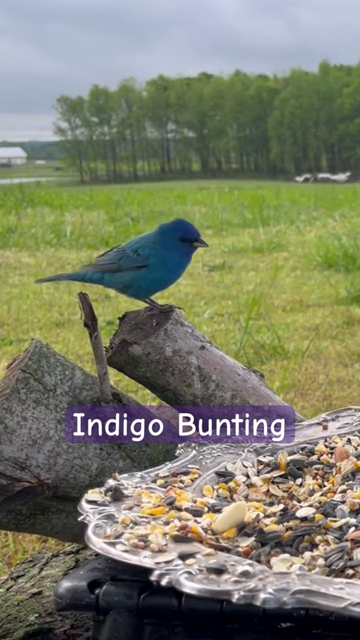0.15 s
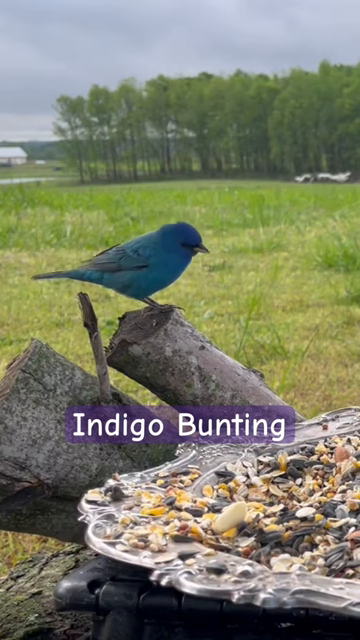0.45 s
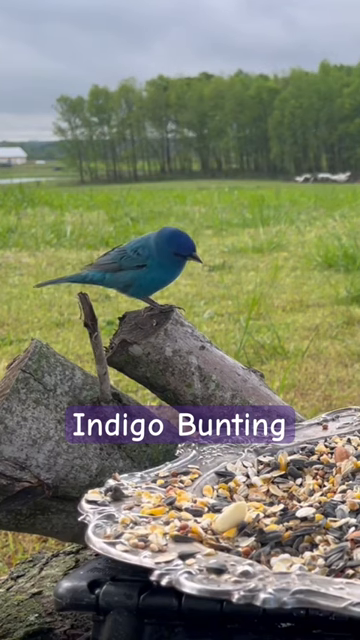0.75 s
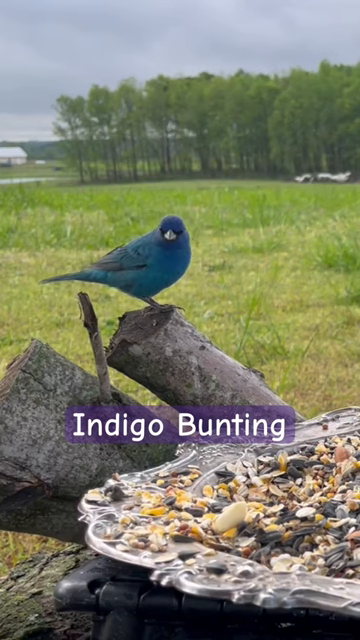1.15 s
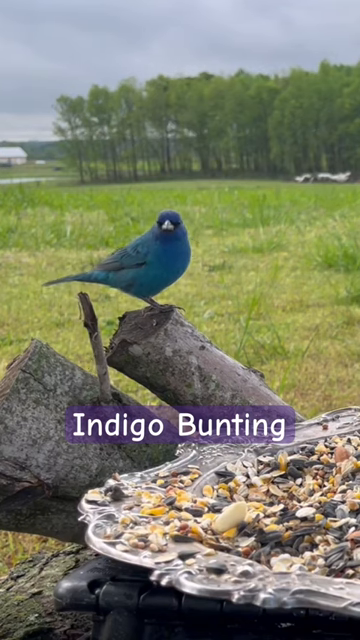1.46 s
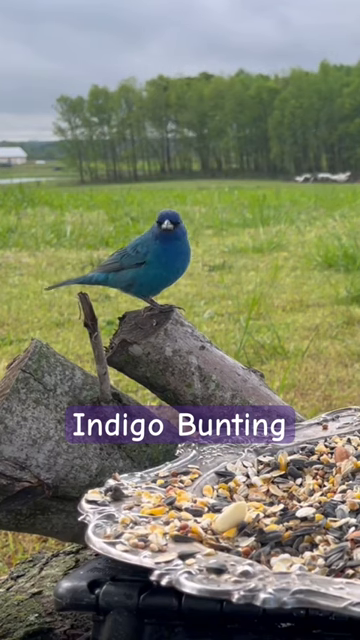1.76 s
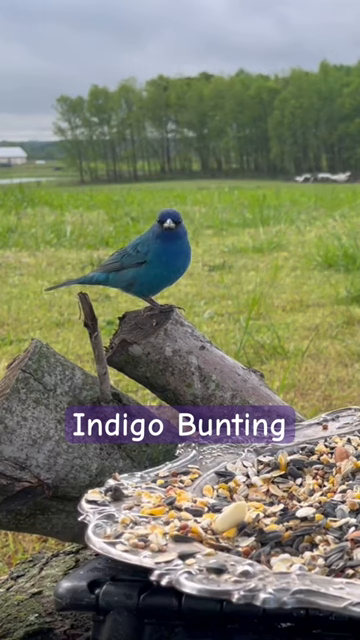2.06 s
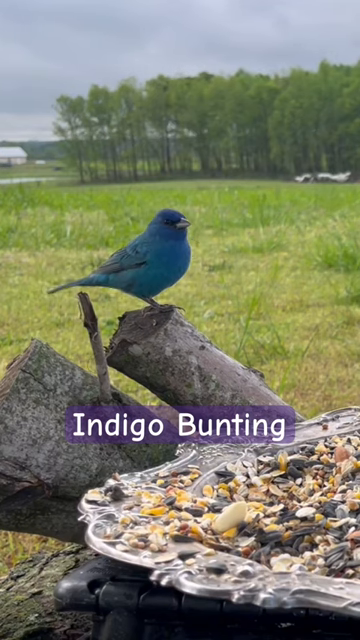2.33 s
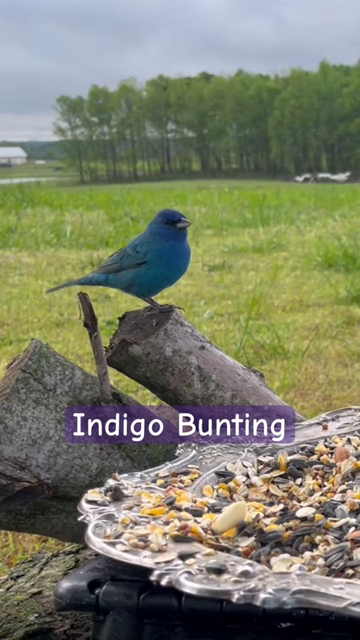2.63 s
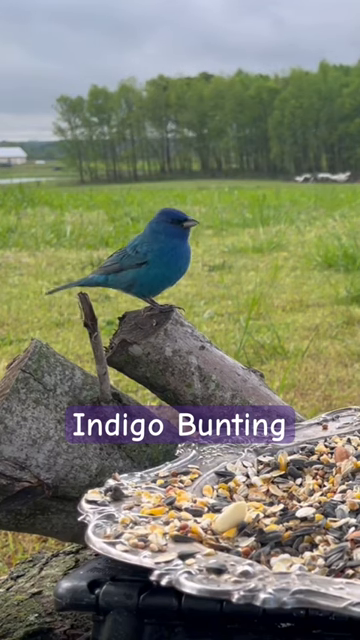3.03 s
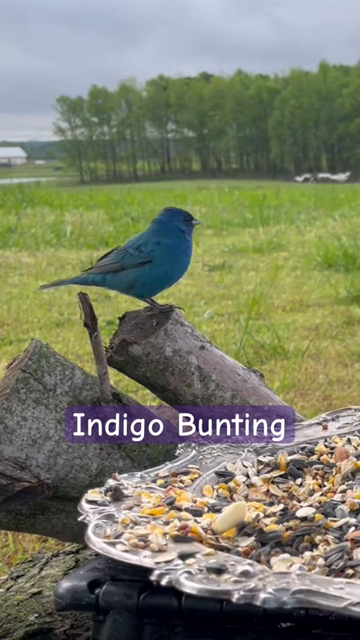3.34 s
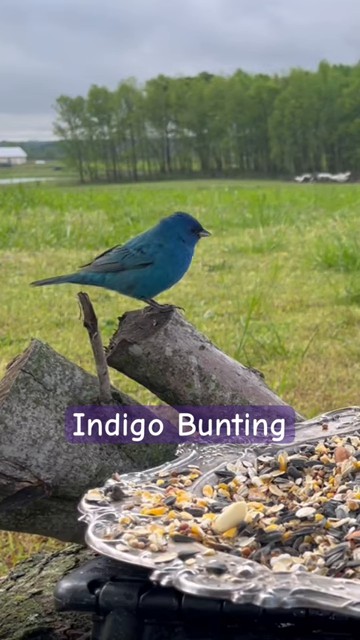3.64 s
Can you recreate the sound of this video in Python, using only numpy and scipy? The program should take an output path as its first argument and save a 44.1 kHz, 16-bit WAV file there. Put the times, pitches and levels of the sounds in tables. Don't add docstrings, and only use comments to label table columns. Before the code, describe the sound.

Deep wind rumble flutters on a small stereo microphone throughout, with soft thumps in the first 0.7 seconds and around 1.2-1.6. Faint falling whistles and slurs from distant trees open the scene, then thin to sparse high chips and hoarse rising calls near 0.7 and 1.6. At 3.0-3.4 a nearer bird buzzes among clear pipes; a heavy wind thump hits at 3.6. Tiny dry ticks and outdoor hush remain faint.

```python
import sys
import numpy as np
from scipy import signal
from scipy.fft import rfft, irfft
from scipy.io import wavfile
from scipy.ndimage import uniform_filter1d

SR = 44100
rng = np.random.default_rng(int(sys.argv[2]) if len(sys.argv) > 2 else 0)


def waveform_to_disk(signal):
    frames = np.transpose(np.atleast_2d(signal))
    scaled = np.clip(frames, -1, 1) * 32767
    samples = np.round(scaled).astype(np.int16)
    wavfile.write(sys.argv[1], SR, samples)


def gain_from_db(level_db):
    decades = np.asarray(level_db, float) / 20
    return 10 ** decades


N = 167139
TREE_T60_S = 0.21


def over_hz(table, size):
    hz, value = np.array(table, float).T
    lines = np.arange(size // 2 + 1) * SR / size
    return np.interp(np.log(np.maximum(lines, 1)), np.log(hz), value)


def over_s(table):
    s, value = np.array(table, float).T
    return np.interp(np.arange(N) / SR, s, value)


def walk(rate_hz):
    k = max(int(SR / rate_hz), 1)
    drift = rng.standard_normal(N)
    for _ in range(2):
        drift = uniform_filter1d(drift, k, mode="wrap")
    return drift / drift.std()


def pair(colour, alike, flutter=1):
    mid, side = rfft(rng.standard_normal((2, N)) * flutter) * gain_from_db(over_hz(colour, N))
    alike = np.clip(alike, 0, 1)
    left_right = np.array([[1], [-1]])
    out = irfft(mid * np.sqrt(1 + alike) + side * np.sqrt(1 - alike) * left_right, N)
    return out / out.std()


def add(track, s, note):
    i = int(s * SR)
    track[i:i + len(note)] += note[:len(track) - i]


def place(track, pan_db, echo_db, t60_s=TREE_T60_S, lag_s=0):
    t = np.arange(SR // 2) / SR
    build_up = np.minimum(t / 0.013, 1)
    tail = rng.standard_normal((2, len(t))) * gain_from_db(-60 * t / t60_s) * build_up
    tail *= gain_from_db(echo_db) / np.sqrt((tail ** 2).sum(axis=1, keepdims=True))
    hz = np.arange(N // 2 + 1) * SR / N
    late = irfft(rfft(track) * np.exp(-2j * np.pi * hz * lag_s), N)
    echoes = signal.fftconvolve(track[None], tail, axes=1)[:, :N]
    return (np.array([track, late]) + echoes) * gain_from_db(np.array([[pan_db], [-pan_db]]) / 2)


def whistles(table, bend, edge, wobble, patchy_db, rate_hz):
    track, drift, patch = np.zeros(N), walk(rate_hz), walk(rate_hz / 2)
    for s, length, first, last, db in table:
        u = np.arange(int(length * SR)) / (length * SR)
        near = slice(int(s * SR), int(s * SR) + len(u))
        u = u[:len(drift[near])]
        hz = first + (last - first) * np.expm1(-bend * u) / np.expm1(-bend)
        phase = 2 * np.pi * np.cumsum(hz * (1 + wobble * drift[near])) / SR
        shape = np.clip(np.minimum(u, 1 - u) / edge, 0, 1) ** 2
        level = np.sqrt(2) * gain_from_db(db + patchy_db * patch[near])
        add(track, s, level * shape * np.sin(phase))
    return track


def eddies(table, cycles, sag):
    track = np.zeros(N)
    for s, db, hz in table:
        length_s = cycles / hz
        u = np.linspace(-1, 1, int(length_s * SR))
        swing = np.cos(np.pi * cycles * (u - sag * u ** 2))
        add(track, s - length_s / 2, -gain_from_db(db) * np.cos(np.pi * u / 2) ** 1.15 * swing)
    return track


# t/s, level/dB
WIND_LEVEL = [(0, -43.5), (.3, -49.5), (.6, -46), (1.0, -48.5), (1.5, -45.5), (1.8, -48), (2.1, -49.5),
              (2.4, -49), (2.65, -45.5), (3.0, -46.5), (3.45, -54.5), (3.79, -46)]
# f/Hz, density/dB
WIND_COLOUR = [(18, -24), (40, -2), (68, 1.5), (130, -5.5), (250, -20), (400, -24.5), (1500, -120)]


def rumble():
    return pair(WIND_COLOUR, 0.6, gain_from_db(2 * walk(34))) * gain_from_db(over_s(WIND_LEVEL))


# centre t/s, peak level/dB, f/Hz
SWINGS = [(0.05, -34, 78), (0.116, -36.5, 76), (0.253, -29, 81.7), (0.29, -43.5, 72), (0.38, -33, 65.8),
          (0.555, -40, 79), (0.605, -37, 73), (1.152, -39.5, 81.6), (1.228, -35, 79), (1.327, -38.0, 84),
          (1.368, -42, 74), (1.433, -38, 77.5), (1.459, -37.3, 76), (1.506, -34.5, 72.4),
          (1.549, -39.5, 65.5), (1.94, -32.5, 87), (2.592, -37, 63), (2.698, -41.5, 66),
          (2.779, -38.5, 79.4), (2.807, -43.5, 73), (3.212, -35.5, 72), (3.29, -36, 80.4),
          (3.357, -41, 69.8), (3.616, -18, 74.3), (3.656, -37, 80), (3.725, -34, 80.7)]
# centre t/s, peak level/dB, f/Hz
FLAPS = [(0.104, -35.5, 162), (0.128, -30, 134), (0.247, -30.5, 196), (0.364, -38, 175),
         (0.544, -42.3, 274), (0.574, -38, 127), (0.599, -41, 170), (0.673, -43, 172), (0.702, -39, 206),
         (1.223, -39.5, 125), (1.326, -37, 179), (1.405, -42, 140), (1.423, -36.6, 138),
         (1.456, -42.5, 162), (1.49, -37.5, 119.5), (1.531, -35, 123.5), (1.601, -39.5, 146),
         (1.628, -38.5, 226), (1.747, -46.5, 217), (1.871, -41.7, 138), (1.923, -42, 138),
         (2.62, -36, 145.7), (3.171, -39, 133), (3.195, -35.5, 166), (3.602, -21.5, 159.6),
         (3.624, -37, 120)]
# centre t/s, peak level/dB, f/Hz
MORE_FLAPS = [
    (.321, -47.5, 470),
    (.433, -51.5, 390),
    (0.806, -55.5, 400),
    (1.372, -53.5, 480),
    (3.607, -39.5, 322),
    (3.621, -39, 265),
    (.809, -44.5, 197),
    (1.09, -44, 185),
    (2.191, -49, 152),
]


def buffets():
    small = eddies(FLAPS, 3.01, 0.32) + eddies(MORE_FLAPS, 3.01, 0.32)
    return place(eddies(SWINGS, 2.34, 0.12) + small, 0, -19, .03)


# t/s, length/s, lowest f/Hz, highest f/Hz, level/dB
BUZZES = [
    (0, 0.023, 3970, 4950, -78.5),
    (2.964, 0.052, 3460, 5180, -65),
    (3.004, 0.041, 3240, 4930, -64.5),
    (3.08, 0.047, 3480, 5220, -69),
    (3.191, 0.046, 3860, 5230, -63.5),
    (3.291, 0.083, 4010, 4940, -71),
]
BUZZ_AIR_DB = [1, -5, 1.5, -7.5, 2, 3.5]
BUZZ_OVERTONES_DB = [-8.5, -24]
# f/Hz, density/dB
BUZZ_BREATH = [(3000, -30), (4500, -9), (6300, -15), (8200, -3), (9200, -10), (10300, -7), (14100, -15),
               (14500, -35)]


def buzzes():
    tone, top = np.zeros(N), np.zeros(N)
    drift, waver, air = walk(270), walk(90), pair(BUZZ_BREATH, 1)[0]
    for (s, length, low, high, db), air_db in zip(BUZZES, BUZZ_AIR_DB):
        t = np.arange(int(length * SR)) / SR
        u = t / length
        near = slice(int(s * SR), int(s * SR) + len(t))
        arch = np.abs(np.sin(np.pi * 121 * t + .35 * waver[near]))
        reach = np.minimum(.4 + u * 1.6, 1)
        hz = (low + (high - low) * reach * arch) * (1 + .018 * drift[near])
        phase = 2 * np.pi * np.cumsum(hz) / SR
        over = sum(gain_from_db(g) * np.sin((k + 2) * phase) for k, g in enumerate(BUZZ_OVERTONES_DB))
        breath = gain_from_db(air_db - 3.5 + drift[near]) * reach ** 2 * air[near]
        shape = gain_from_db(db) * np.clip(np.minimum(u / .62, (1 - u) / .12), 0, 1)
        add(tone, s, shape * (0.87 + arch) * np.sin(phase))
        add(top, s, shape * (over * (1.2 - arch) + breath * (1.8 - arch)))
    return place(tone, 12.8, -9, .35, lag_s=.00006) + place(top, 0, -9, .25)


# t/s, length/s, first f/Hz, last f/Hz, level/dB
PIPED = [
    (2.2, 0.079, 3050, 3080, -90.5),
    (2.32, 0.15, 3055, 3000, -89.5),
    (2.475, .15, 3040, 3050, -85.5),
    (3.025, 0.082, 3310, 3380, -66.5),
    (3.096, 0.063, 3290, 2360, -76),
    (3.133, 0.12, 3367, 3290, -64),
    (3.485, 0.045, 3330, 3265, -72),
    (3.54, 0.077, 3300, 2300, -77),
    (3.468, 0.061, 4650, 4330, -77),
    (3.63, 0.037, 4240, 4320, -82),
]


def pipes():
    return place(whistles(PIPED, -1.2, .1, .002, 1.5, 80), 3, -12)


# t/s, length/s, first f/Hz, last f/Hz, level/dB
FALLS = [(.052, .045, 4150, 3800, -70), (.135, .04, 4090, 3960, -76), (.17, .18, 4450, 3590, -68),
         (.182, .035, 2260, 1970, -76), (.187, .185, 4600, 3980, -71), (.25, .11, 4430, 4330, -79),
         (.602, .03, 2400, 1990, -76), (3.11, .12, 4450, 3950, -75), (3.238, .068, 3760, 3780, -71.5),
         (3.245, .08, 4200, 4150, -79), (3.512, .115, 4350, 4130, -68.5), (3.662, .075, 4340, 3540, -70),
         (3.7, .045, 5060, 4800, -86), (3.715, .17, 3550, 3580, -72)]


def falls():
    return place(whistles(FALLS, 3, .15, .003, 2.5, 120), 2, -7)


# t/s, length/s, first f/Hz, last f/Hz, level/dB
LOW_SLURS = [(.04, 0.027, 4060, 4460, -75), (0, 0.039, 3870, 4050, -72.5), (.086, 0.037, 2710, 2590, -76.5),
             (.117, 0.036, 2630, 2900, -73), (.125, 0.067, 1785, 2480, -72), (.238, 0.04, 2220, 2090, -70),
             (.275, 0.022, 2260, 2630, -74.5), (.405, 0.067, 1780, 2370, -75),
             (.452, 0.025, 3990, 4470, -76.5), (.512, 0.041, 2660, 2590, -76),
             (.543, 0.026, 2600, 2860, -74.5), (.615, 0.046, 3520, 4380, -84),
             (.688, 0.07, 1806, 2310, -72), (.76, .05, 2850, 3400, -80), (.968, 0.043, 1780, 2166, -77),
             (1.25, 0.05, 1780, 2310, -77.5), (1.545, 0.04, 1843, 2234, -77.5),
             (2.845, 0.037, 2410, 2330, -77.5), (2.885, 0.026, 2624, 2810, -75.5),
             (3.295, 0.087, 2410, 2350, -75.5), (3.34, 0.037, 2650, 3180, -73),
             (3.745, 0.04, 2530, 2220, -75.5)]


def low_slurs():
    return place(whistles(LOW_SLURS, -.5, .2, .008, 2.5, 200), 5, -4.5)


# t/s, length/s, first f/Hz, last f/Hz, level/dB
HIGH_CALLS = [(.428, 0.023, 5660, 4930, -84), (.93, 0.047, 6900, 5700, -90),
              (1.085, 0.08, 8760, 7400, -88.5), (1.335, 0.018, 7170, 6320, -87),
              (1.576, 0.025, 9230, 4860, -76), (1.768, 0.029, 12000, 9150, -87),
              (1.795, 0.051, 9400, 10600, -92), (1.872, 0.057, 4870, 7380, -80),
              (1.9, 0.088, 7380, 7100, -89.5), (2.13, 0.053, 7340, 7280, -90),
              (2.29, 0.057, 6900, 7200, -85.5), (2.4, .07, 7200, 6860, -96),
              (2.936, 0.023, 8500, 4940, -78.5), (3.47, 0.053, 7360, 6660, -93)]


def high_calls():
    return place(whistles(HIGH_CALLS, 4, .12, .025, 4, 600), 1.3, -1)


# t/s, length/s, first f/Hz, last f/Hz, level/dB
RASPS = [
    (1.57, .34, 2300, 4350, -81),
    (.705, .16, 2100, 4100, -77),
]


def rasps():
    return place(whistles(RASPS, 2.2, .2, .03, 3, 900), -1.6, -1.7)


# t/s, level/dB
TICKS = [
    (.02, -63),
    (3.153, -62),
    (1.613, -70),
    (2.42, -67),
    (2.502, -63),
    (2.637, -68),
    (3.75, -68),
]


def ticks():
    track, t = np.zeros(N), np.arange(SR // 100) / SR
    treble = signal.butter(2, [9500, 12500], "band", fs=SR)
    for s, db in TICKS:
        grain = rng.standard_normal(len(t)) * np.exp(-t / .0008)
        add(track, s, gain_from_db(db) * signal.lfilter(*treble, grain))
    return place(track, 0, -2.5, 0.046)


# t/s, level/dB
CHORUS_LEVEL = [(0, -77.5), (.55, -83), (1.0, -90), (2.7, -101), (3.1, -78.5), (3.79, -87)]


def chorus():
    when, pitch, slide, size = rng.random((1500, 4)).T
    low_hz, high_hz, note_s = 2447, 4410, .035
    first = high_hz - (high_hz - low_hz) * pitch ** 1.5
    last = first - 900 * (slide - .3)
    notes = zip(when * (N / SR - .1), note_s * (.5 + size), first, last, -8 * size)
    track = whistles(notes, 2.3, .4, .03, 2.5, 600) * gain_from_db(over_s(CHORUS_LEVEL) - 4)
    return place(track, 5.7, 2.4)


# f/Hz, density/dB
HUSH_COLOUR = [(250, -18.5), (450, -9.5), (800, -17), (1700, -24.5), (3500, -34.5), (6500, -45),
               (13000, -53.5)]
# t/s, level/dB
HUSH_LEVEL = [(0, -66), (.4, -64), (1.5, -65), (2.3, -68), (3.79, -66.5)]
# f/Hz, likeness/0-1
HUSH_ALIKE = [(300, 1), (700, 0), (3000, 1), (6000, .2), (7800, .95)]


def hush():
    air = pair(HUSH_COLOUR, over_hz(HUSH_ALIKE, N), gain_from_db(1.5 * walk(5))) * gain_from_db(over_s(HUSH_LEVEL))
    return signal.sosfilt(signal.ellip(8, .2, 50, 13100, fs=SR, output="sos"), air)


def scene():
    near = rumble() + buffets() + buzzes() + ticks()
    trees = pipes() + falls() + low_slurs() + high_calls() + rasps()
    return near + trees + chorus() + hush()


# f/Hz, phase/rad
PORT_TURN = [(400, .67), (1100, 3), (2000, 6.5), (3800, 7.5), (5500, 6.5), (7800, 3.5), (9100, 2.8),
             (11000, 0)]


def housing(dry):
    turn = over_hz([(5.2, 0.0057)] + PORT_TURN, N)
    return np.array([dry[0], irfft(rfft(dry[1]) * np.exp(-1j * turn), N)])


def top_cut(x):
    return signal.sosfilt(signal.butter(12, 14980, fs=SR, output="sos"), x)


def record(dry):
    mix = housing(dry)
    return top_cut(mix)


dry = scene()
out = record(dry)
waveform_to_disk(out)
```